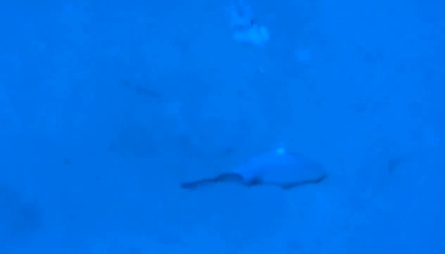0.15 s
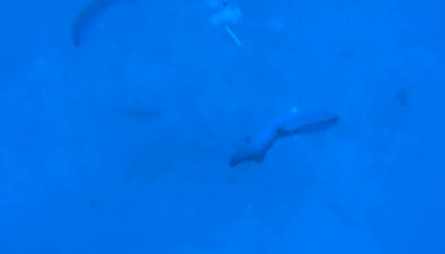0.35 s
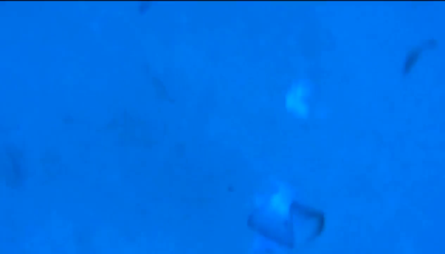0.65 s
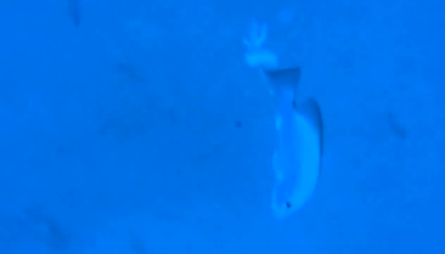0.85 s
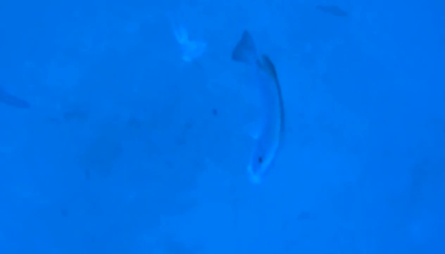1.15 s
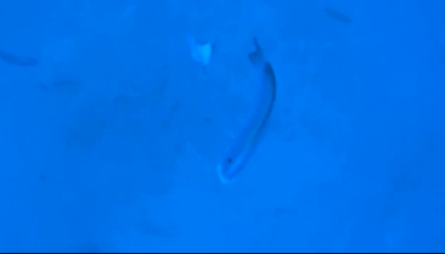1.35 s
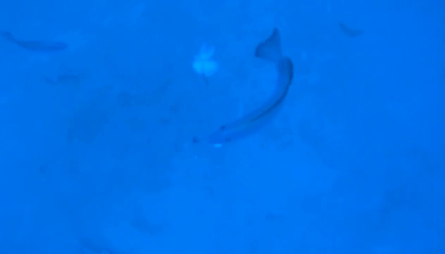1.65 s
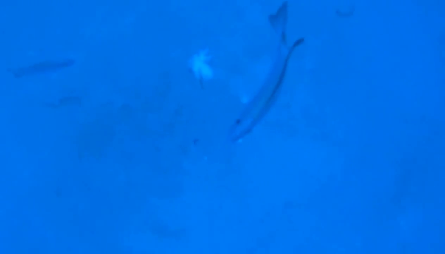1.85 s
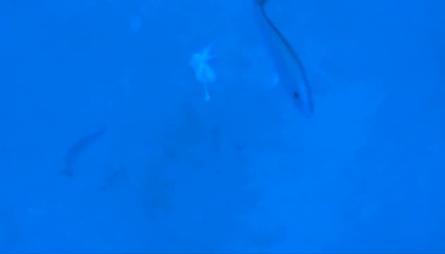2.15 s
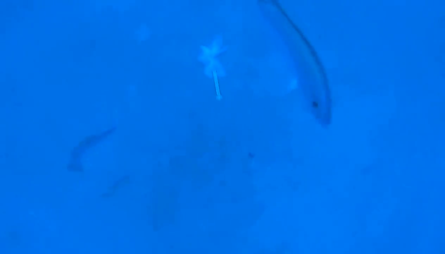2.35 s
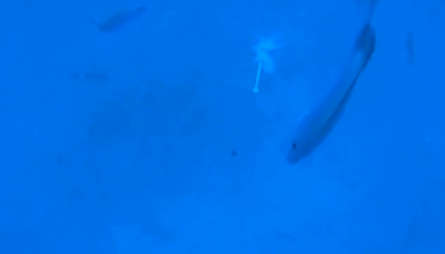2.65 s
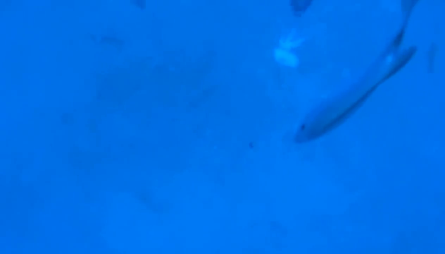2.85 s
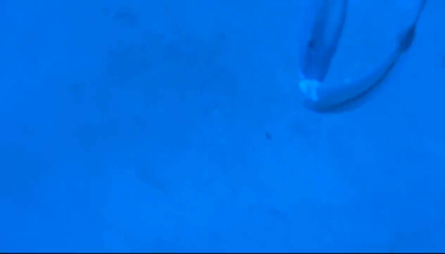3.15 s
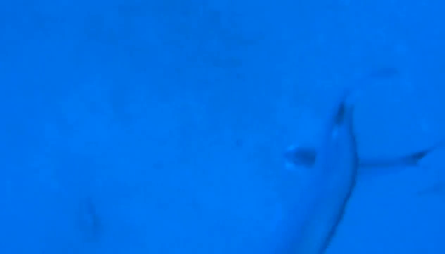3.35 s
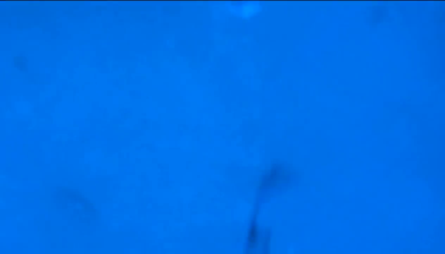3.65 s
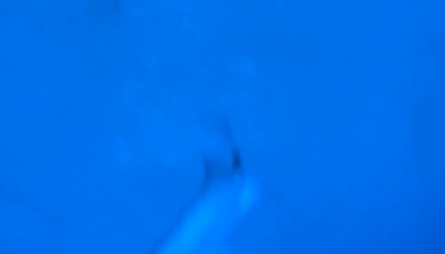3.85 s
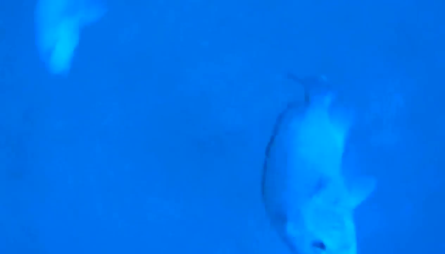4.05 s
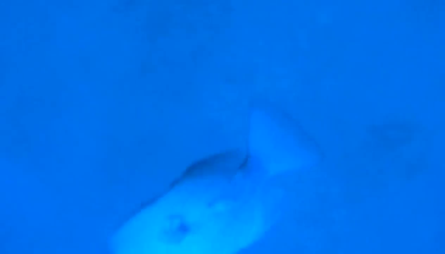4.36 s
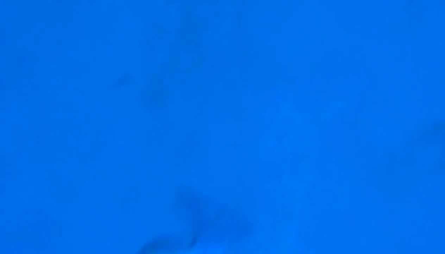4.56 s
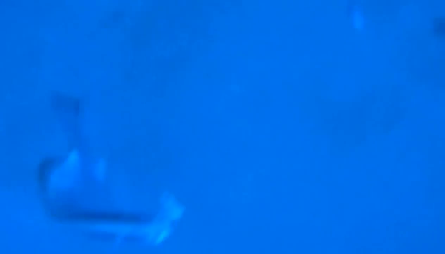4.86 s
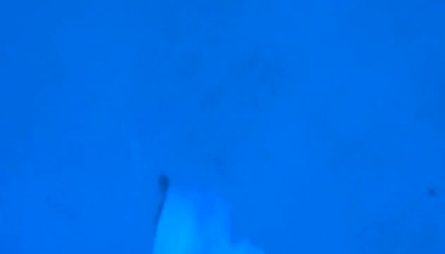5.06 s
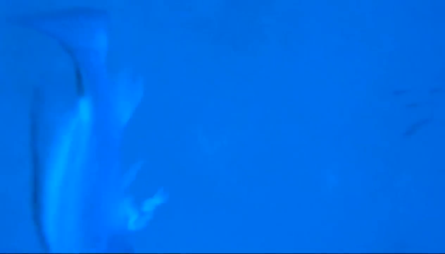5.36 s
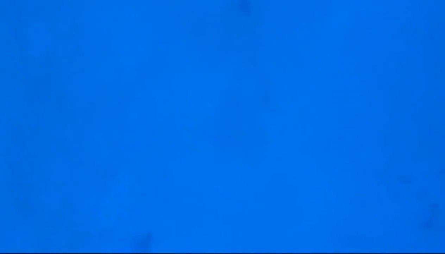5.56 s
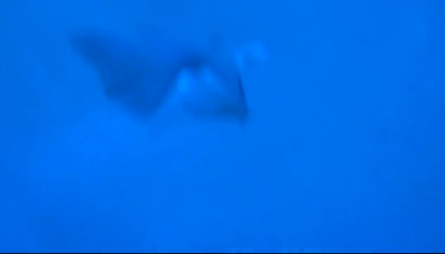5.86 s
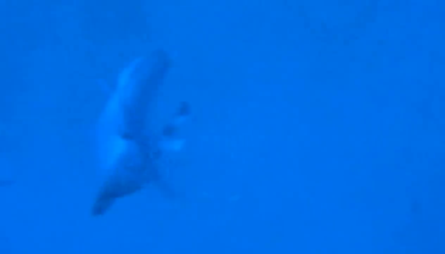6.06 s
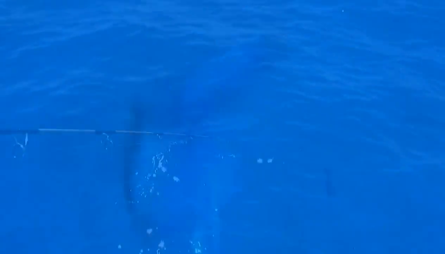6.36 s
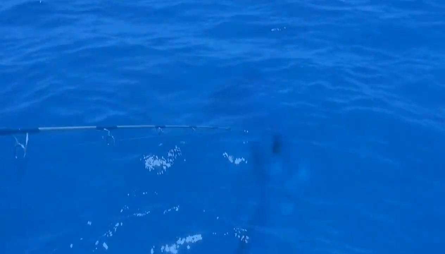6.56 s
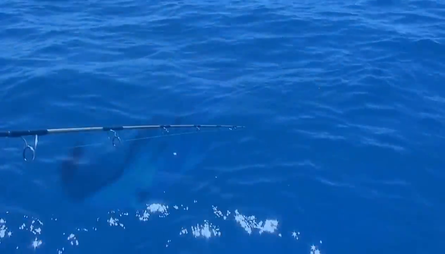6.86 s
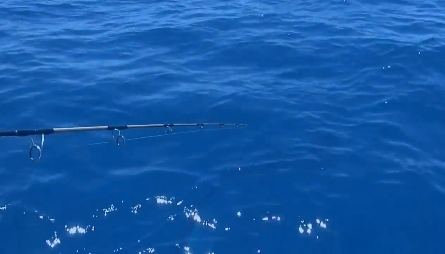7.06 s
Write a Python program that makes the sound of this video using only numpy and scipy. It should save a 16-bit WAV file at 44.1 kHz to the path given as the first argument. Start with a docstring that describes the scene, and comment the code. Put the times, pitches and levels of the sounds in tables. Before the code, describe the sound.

Muffled, hollow underwater handling noise heard by a microphone sealed in a small housing on a fishing line. Brief tugs and clicks give way to a wavering low hum, then an abrupt flurry of knocks, singing line rubs and gritty scrapes. Sparser bumps follow, quietening. Finally the treble opens, with wash, gulps and hard clatter at the sea surface.

```python
"""Underwater camera on a fishing line

A camera in a plastic housing hangs under water while fish snatch at the bait; a faint boat hum and hiss lie beneath.
Knocks, thuds and ticks are short noise contacts, line drags are stick-slip grains; both ring banks of resonances.
Buffeting and the sea wash are shaped noise, the water's gulps are gliding tones in short swells.
Near the end the sea wash joins, the sound gets brighter and the handling goes on.
Source levels in dB are relative, before the source trims and the limiter."""
import sys
import numpy as np
from scipy import signal
from scipy.fft import rfft, irfft, next_fast_len
from scipy.io import wavfile
from scipy.ndimage import uniform_filter1d, minimum_filter1d, map_coordinates

SR = 44100
rng = np.random.default_rng(int(sys.argv[2]) if len(sys.argv) > 2 else 0)


def digitize_waveform(pressure):
    """Quantize a signal to 16-bit integers and store it at the path in sys.argv[1].

    Rows of a 2-D input are taken as channels; values are limited to [-1, 1].
    """
    field = np.atleast_2d(pressure).T
    bounded = np.clip(field, -1, 1)
    quanta = np.round(bounded * 32767).astype(np.int16)
    wavfile.write(sys.argv[1], SR, quanta)


N = 318402


def from_db(db):
    """Decibels to amplitude gain."""
    return 10 ** (np.asarray(db) / 20)


def rms_one(x):
    """Scale to unit rms."""
    return x / np.sqrt(np.mean(x ** 2) + 1e-20)


def in_time(rows):
    """Breakpoint curve (t/s, value) at every sample."""
    return np.interp(np.arange(N) / SR, *np.transpose(rows))


def at_hz(points, hz):
    """Breakpoint curve (f/Hz, value) read on a log-frequency axis."""
    points = np.array(points)
    return np.interp(np.log(hz), np.log(points[:, 0]), points[:, 1])


def drift(rate_hz):
    """Slow random curve, about unit rms: noise through a double pole, run at SR / 40."""
    step = 40
    settle = 2000
    r = np.exp(-2 * np.pi * rate_hz * step / SR)
    noise = rng.standard_normal(N // step + settle + 2)
    slow = signal.lfilter([1], [1, -2 * r, r * r], noise)[settle:]
    return np.interp(np.arange(N) / step, np.arange(len(slow)), rms_one(slow))


def butter(x, order, hz, kind="low"):
    """Butterworth filter."""
    return signal.sosfilt(signal.butter(order, hz, kind, fs=SR, output="sos"), x)


def low_pass(x, hz):
    """Steep elliptic low-pass: 0.2 dB ripple, 80 dB stopband."""
    return signal.sosfilt(signal.ellip(10, .2, 80, hz, fs=SR, output="sos"), x)


def resonate(x, hz, width_hz):
    """Two-pole resonance, about unit gain at its peak."""
    r = np.exp(-np.pi * width_hz / SR)
    numerator = np.array([1, 0, -1]) * (1 - r * r) / 2
    denominator = [1, -2 * r * np.cos(2 * np.pi * hz / SR), r * r]
    return signal.lfilter(numerator, denominator, x + 1e-18)


# left-right likeness: f/Hz, likeness/0-1
STEREO_LIKENESS = [(90, 1), (400, 0.47), (700, 0.48), (1350, 0.95), (2200, 0.29), (4800, 0.23),
                   (10000, 0.38), (12000, 1)]


def spread(pair, hz):
    """Two unrelated signals become left and right, as alike as the likeness curve sets at this pitch."""
    alike = np.clip(at_hz(STEREO_LIKENESS, hz), 0, .99)
    middle = np.sqrt(1 + alike) * pair[0]
    side = np.sqrt(1 - alike) * pair[1]
    return middle + side * np.array([[1], [-1]])


def coloured_noise(spectrum):
    """Steady stereo noise with the given spectrum; unit rms."""
    size = next_fast_len(N)
    hz = np.maximum(np.fft.rfftfreq(size, 1 / SR), 1)
    white = rfft(rng.standard_normal((2, size)))
    shaped = spread(white, hz) * from_db(at_hz(spectrum, hz))
    return rms_one(irfft(shaped, size)[:, :N])


def body(force, modes):
    """A pair of contact forces rings through parallel resonances of alternating sign."""
    out = 0
    for k, (hz, width_hz, db) in enumerate(modes):
        out = out + (-1) ** k * from_db(db) * resonate(spread(force, hz), hz, width_hz)
    return out


def blows(events, modes, lead_s, soft_hz, contact_s, skid_db, skid_s, vary_db, detune):
    """Each blow is a short rough contact and a skid; where it lands sets the strength and tuning of the modes."""
    out = np.zeros((2, N + SR))
    t = np.arange(SR // 10) / SR
    contact = np.exp(-(t / contact_s - 2) ** 2)
    skid = from_db(skid_db) * np.exp(-t / skid_s) * (t > 2 * contact_s)
    for s, db in events:
        chance = np.clip(rng.standard_normal((len(modes), 2)), -2, 2)
        struck = [(hz * (1 + detune * a), width_hz, level_db + vary_db * b)
                  for (hz, width_hz, level_db), (a, b) in zip(modes, chance)]
        force = (contact + skid) * rng.standard_normal((2, len(t)))
        ring = body(butter(force, 2, soft_hz), struck)   # a soft contact carries little treble
        loudest = np.sqrt(uniform_filter1d(np.mean(ring ** 2, axis=0), size=150).max())
        start = max(round((s - lead_s) * SR), 0)   # start early so that the blow peaks near its listed time
        out[:, start:start + len(t)] += from_db(db) * ring / loudest
    return out[:, :N]


def stick_slip(modes, per_s, size_db, judder_db, judder_hz, colour_db, colour_hz):
    """Friction: clumped tiny slips ring the modes, now one, now another as the contact moves; unit rms."""
    judder = judder_db * np.tanh(drift(judder_hz))
    sizes = from_db(size_db * np.minimum(rng.exponential(1, N), 4) + judder)
    slips = (rng.random(N) < per_s / SR) * sizes * rng.standard_normal((2, N))
    shifting = [(hz, width_hz, db + colour_db * np.tanh(drift(colour_hz))) for hz, width_hz, db in modes]
    return rms_one(body(slips, shifting))


# hiss and rumble spectrum: f/Hz, density/dB per Hz
FLOOR_SPECTRUM = [(25, -13), (70, -6.5), (130, -26.5), (400, -6), (1100, -24), (3900, -22.5), (4800, -18),
                  (5600, -22), (11000, -28)]
# hiss and rumble: t/s, level/dB
FLOOR_LEVEL = [(0, -54), (3.6, -55), (7.22, -70)]
# boat hum bands, and a faint housing ring near 680 Hz: f/Hz, width/Hz, level/dB
HUM_BANDS = [(125.6, 27, -60), (190.6, 15, -64), (680, 44, -59)]
# swell of the hum and housing ring: t/s, level/dB
HUM_SWELL_LEVEL = [(0, 1), (1.45, 7.5), (2.15, -2.5), (2.45, 3), (2.8, 3.5), (3.1, 3)]


def background(waver_db=4.5, waver_hz=3.0):
    """Hiss and distant rumble as shaped noise; boat hum and a faint housing ring as narrow noise bands that
    waver separately."""
    hum = 0
    for hz, width_hz, db in HUM_BANDS:
        band = rms_one(resonate(spread(rng.standard_normal((2, N)), hz), hz, width_hz))
        hum = hum + from_db(db + waver_db * drift(waver_hz)) * band
    floor = from_db(in_time(FLOOR_LEVEL)) * coloured_noise(FLOOR_SPECTRUM)
    return floor + from_db(in_time(HUM_SWELL_LEVEL)) * hum


# soft, low thuds on the housing: t/s, level/dB
THUD_EVENTS = [(0.028, -39.5), (3.165, -35.5), (5.51, -25.5), (6.903, -33)]
# housing resonances, also for knocks and rubbing: f/Hz, width/Hz, level/dB
HOUSING_MODES = [(300, 104, -18.5), (538, 82, -10), (697.8, 50, -2), (954.5, 71, -10), (1181, 105, -6.5),
                 (1352.6, 70.7, 4), (1468, 78.3, 3), (2190, 1530, -26), (3164, 83, -24), (4550, 110, -34)]


def thuds():
    """Slow, soft contacts with little treble ring the housing modes."""
    return blows(THUD_EVENTS, HOUSING_MODES, lead_s=0.00286, soft_hz=200, contact_s=0.0033,
                 skid_db=-6, skid_s=0.0068, vary_db=1, detune=.01)


# hard, bright contacts of the tackle: t/s, level/dB
TICK_EVENTS = [(0.34, -37.5), (0.6707, -27), (0.6939, -18.5), (0.7421, -19), (0.7502, -30.5), (0.7604, -14),
               (0.8394, -24), (0.8503, -22), (0.9916, -9.5), (1.1873, -28), (2.307, -41.5), (3.1643, -35),
               (3.2646, -21.5), (3.2803, -12), (3.3291, -16), (3.3436, -26), (3.4318, -32), (3.4497, -21),
               (3.486, -15.5), (3.5363, -13.5), (3.6593, -20), (3.6834, -17), (3.7107, -17), (3.786, -14),
               (3.8299, -20.5), (3.949, -11), (3.965, -11.5), (3.996, -23.5), (4.0354, -13),
               (4.1542, -18.5), (4.2141, -21), (4.3035, -26), (4.3835, -19), (4.3967, -18), (4.4678, -12),
               (4.5064, -26.5), (4.5621, -12), (4.6199, -10.5), (4.6637, -17), (4.7082, -20.5),
               (4.7596, -23.5), (4.8448, -20.5), (4.8926, -25.5), (4.9355, -23), (4.9455, -28.5),
               (4.9644, -31), (5.0541, -23), (5.0714, -29.5), (5.1918, -20), (5.2468, -22.5),
               (5.333, -22.5), (5.3772, -39), (5.416, -34.5), (5.566, -35), (5.7154, -36), (5.755, -35),
               (5.7917, -32.5), (5.8628, -27), (5.8768, -27.5), (5.9282, -30), (6.0034, -30.5),
               (6.0847, -30.5), (6.2114, -39), (6.526, -30), (6.553, -32), (6.5711, -19.5), (6.5848, -21.5),
               (6.695, -29), (6.7462, -27), (6.7951, -14.5), (6.8934, -5.5), (6.9078, -10), (7.1574, -9.5)]
# resonances excited by hard contact, also for scraping: f/Hz, width/Hz, level/dB
SHELL_MODES = [(1340, 640, 2.5), (2370, 670, 5.5), (3195, 207, 9.5), (4880, 440, 12), (5880, 6800, -1.5),
               (8190, 540, 6.5), (10330, 1030, -8), (12800, 5500, -17.5)]


def ticks(trim_db=3.0):
    """Short, hard contacts with much treble ring the high modes."""
    return from_db(trim_db) * blows(TICK_EVENTS, SHELL_MODES, lead_s=.0005, soft_hz=12200, contact_s=0.00094,
                                    skid_db=-2, skid_s=.0035, vary_db=2.5, detune=0.042)


# dull tugs on the housing: t/s, level/dB
KNOCK_EVENTS = [(0.3439, -32.5), (0.5455, -34.5), (0.6487, -23.5), (0.756, -13.5), (0.914, -11),
                (0.9932, -10.5), (1.0225, -20.5), (1.1864, -24.5), (1.644, -31), (2.1736, -38.5),
                (2.3061, -35), (2.9403, -35.5), (3.0919, -36.5), (3.2645, -11), (3.3856, -17.5),
                (3.4655, 0.5), (4.8444, -11.5), (4.9226, -14.5), (5.052, -19.5), (5.1299, -15),
                (5.1977, -10), (5.5157, -17.5), (5.6199, -15.5), (5.7177, -9.5), (5.8604, -18.5),
                (6.2537, -42.5), (6.4692, -10), (6.553, -13.5), (6.5733, -9), (6.598, -10), (6.6635, -10.5),
                (6.8929, 5.5), (6.911, -4.5)]


def knocks(trim_db=-0.5):
    """Dull contacts with a strong skid ring the housing modes."""
    return from_db(trim_db) * blows(KNOCK_EVENTS, HOUSING_MODES, lead_s=0.003508, soft_hz=2210, contact_s=.0017,
                                    skid_db=9.5, skid_s=0.0061, vary_db=1.5, detune=0.0088)


# line pulled across the housing: start t/s, length/s, level/dB, grit level/dB
DRAG_EVENTS = [(0.682, 0.027, -17, -29.5), (0.719, 0.041, -20.5, -32), (0.835, 0.027, -17, -32.5),
               (0.911, 0.042, -22, -34), (1.117, 0.027, -27, -49.5), (1.998, 0.036, -41.5, -70),
               (2.897, 0.16, -48.5, -85), (3.276, 0.014, -9, -30), (3.333, 0.018, -15.5, -28),
               (3.396, 0.016, -13, -32), (3.467, 0.39, -12.5, -39), (3.545, 0.086, -16, -21.5),
               (3.882, 0.57, -9, -36.5), (4.488, 0.26, -11, -37.5), (4.571, 0.036, -13, -27.5),
               (4.761, 0.031, -15, -38.5), (4.857, 0.1, -21, -49), (4.99, 0.12, -32.5, -88),
               (5.113, 0.024, -12, -33), (5.199, 0.016, -18, -30.5), (5.226, 0.043, -27, -48.5),
               (5.336, 0.0052, -14, -39.5), (5.529, 0.05, -32.5, -64), (5.613, 0.056, -28, -61),
               (5.713, 0.015, -12.5, -37.5), (5.779, 0.037, -22, -64), (5.85, 0.086, -34.5, -55),
               (5.959, 0.057, -30, -51.5), (6.578, 0.027, -15, -37), (6.678, 0.1, -17, -57),
               (6.769, 0.047, -7.5, -42), (6.857, 0.015, -5.5, -41), (7.013, 0.071, -9.5, -29),
               (7.124, 0.062, -10, -45)]
SLACK_DB = -60.5   # rubbing of the slack line between drags
SAG_DB = 4.5   # lost from grip to release
SWAY_DB, SWAY_FALL_DB_PER_S = -16, 175   # the housing sways on after release


def dragging(grip_db_per_s=900, release_db_per_s=600, grit_grip_db_per_s=1300, grit_release_db_per_s=900):
    """Rubbing and grit levels in dB: fast grip, sag, release and faint sway; the strongest drag prevails."""
    t = np.arange(N) / SR
    pull_db, grit_db = SLACK_DB, -np.inf
    for start, length, level, grit in DRAG_EVENTS:
        before = np.maximum(start - t, 0)
        after = np.maximum(t - start - length, 0)
        sag = SAG_DB * np.clip((t - start) / length, 0, 1)
        release = np.maximum(-release_db_per_s * after, SWAY_DB - SWAY_FALL_DB_PER_S * after)
        pull_db = np.maximum(pull_db, level - grip_db_per_s * before - sag + release)
        grit_db = np.maximum(grit_db, grit - grit_grip_db_per_s * before - sag - grit_release_db_per_s * after)
    return pull_db, grit_db


def rubbing(pull_db, trim_db=-1.0, wander=0.01978, evenness=.22):
    """The dragging line keeps the housing singing fairly evenly; sloshing water bends its pitch."""
    ring = stick_slip(HOUSING_MODES, per_s=3100, size_db=0.5, judder_db=5, judder_hz=25.0,
                      colour_db=4.5, colour_hz=14.3)
    power = uniform_filter1d(np.mean(ring ** 2, axis=0), size=400)
    ring = rms_one(ring / power ** evenness)   # 0 = free, .5 = constant strength
    bend = wander * butter(drift(11.4), 1, 2, "high")
    reading = np.arange(N) + np.cumsum(bend)
    bent = np.array([map_coordinates(side, [reading], order=3, mode="mirror") for side in ring])
    return from_db(pull_db + trim_db) * bent


def scraping(grit_db, trim_db=12.0, dull_hz=5500):
    """Crackling stick-slip grains in the high modes, treble softened, only around the pulls."""
    grains = stick_slip(SHELL_MODES, per_s=1800, size_db=0.0, judder_db=13.0, judder_hz=15,
                        colour_db=7.5, colour_hz=38)
    return from_db(grit_db + trim_db) * butter(grains, 1, dull_hz)


def moving(pull_db, onset_db=-46):
    """Near 0 while the housing hangs still, near 1 while the line pulls on it."""
    return 1 / (1 + from_db(onset_db - pull_db) ** 2)


def buffeting(pull_db, trim_db=-38.0, growth=0.24, corner_hz=312):
    """Water pushes on the moving housing: low noise that grows more slowly than the rubbing."""
    lumps = butter(spread(rng.standard_normal((2, N)), corner_hz / 2), 2, corner_hz)
    level_db = trim_db + growth * pull_db + 5.5 * drift(6.7)
    return from_db(level_db) * moving(pull_db) * rms_one(lumps) * from_db([[-2.5], [2]])


# water gulps against the housing: t of top/s, level/dB
GULP_EVENTS = [(3.52, -15.5), (3.645, -17), (6.595, -22.5), (6.715, -13.5), (6.745, -15.5), (6.834, -9),
               (7.09, -17)]


def gulps(hz=686, glide=0.038, swell_s=0.011):
    """Each gulp swells and dies near a low housing resonance, bending up or down in pitch."""
    out = np.zeros(N)
    t = np.arange(N) / SR
    for (s, db), bend in zip(GULP_EVENTS, rng.standard_normal(len(GULP_EVENTS))):
        age = (t - s) / swell_s
        tone = np.sin(2 * np.pi * hz * (t - s) * (1 + glide * bend * age))
        out += from_db(db) * np.exp(-age * age) * tone
    return out


# sea wash spectrum: f/Hz, density/dB per Hz
WASH_SPECTRUM = [(30, -23.5), (200, -5), (1200, -6), (2500, -12.5), (10000, -30.5), (13000, -30.5)]
# wash swell with two splashes: t/s, level/dB
WASH_LEVEL = [(6.42, -31), (6.76, -33), (6.81, -23), (6.94, -27), (6.99, -26), (7.2, -35)]


def sea_wash():
    """Wash of the sea: shaped noise with a set swell and a random flutter in level."""
    return from_db(in_time(WASH_LEVEL) + 2 * drift(22.0)) * coloured_noise(WASH_SPECTRUM)


def scene(open_s=6.37, early_cut_hz=11000):
    """All sources, dull at first; then the treble opens and the wash joins at open_s."""
    pull_db, grit_db = dragging()
    handling = thuds() + ticks() + knocks() + rubbing(pull_db) + scraping(grit_db)
    near = background() + handling + buffeting(pull_db) + gulps()
    opening = in_time([(open_s - .01, 0), (open_s + .01, 1)])
    dull_part = low_pass(near, early_cut_hz)
    open_part = near + sea_wash()
    return ((1 - opening) * dull_part + opening * open_part) * from_db([[-.3], [.3]])


def record(dry, ceiling_db=-4.5, release_db_per_s=500, cutoff_hz=15700):
    """A fast stereo-linked limiter holds the peaks down; a low-pass then cuts the top."""
    over_db = np.maximum(20 * np.log10(np.abs(dry).max(axis=0) + 1e-9) - ceiling_db, 0)
    fall_db = release_db_per_s * np.arange(N) / SR
    gain_db = fall_db - np.maximum.accumulate(over_db + fall_db)
    gain_db = uniform_filter1d(minimum_filter1d(gain_db, size=41), size=41)   # look ahead, then smooth
    return low_pass(dry * from_db(gain_db), cutoff_hz)


dry = scene()
out = record(dry)
digitize_waveform(out)
```